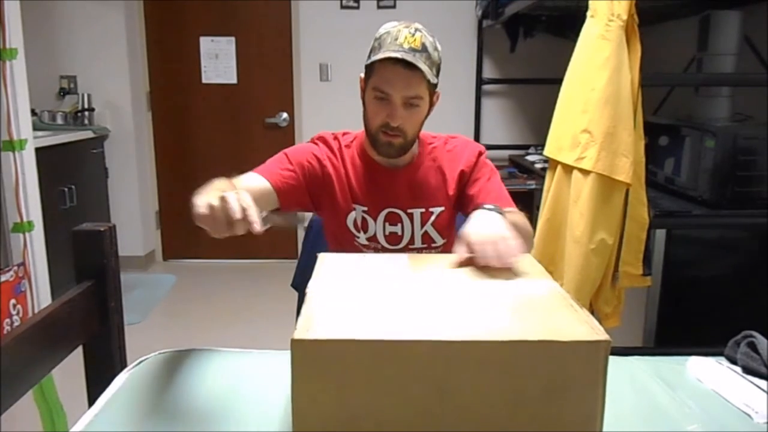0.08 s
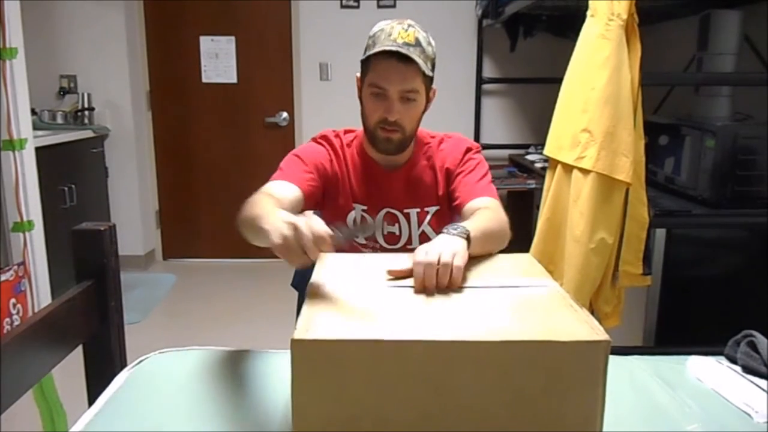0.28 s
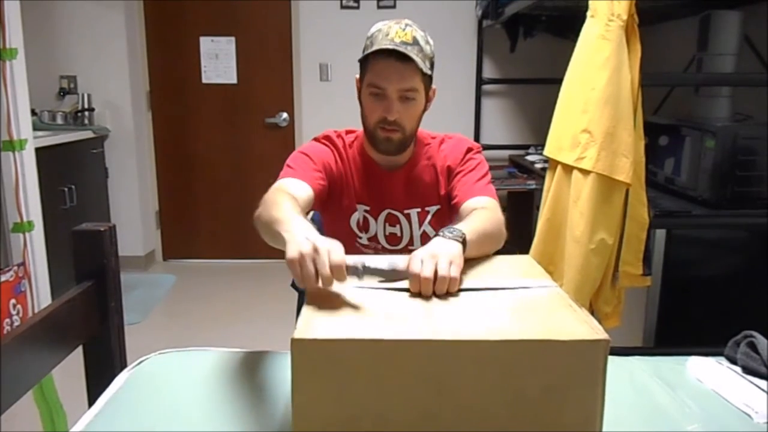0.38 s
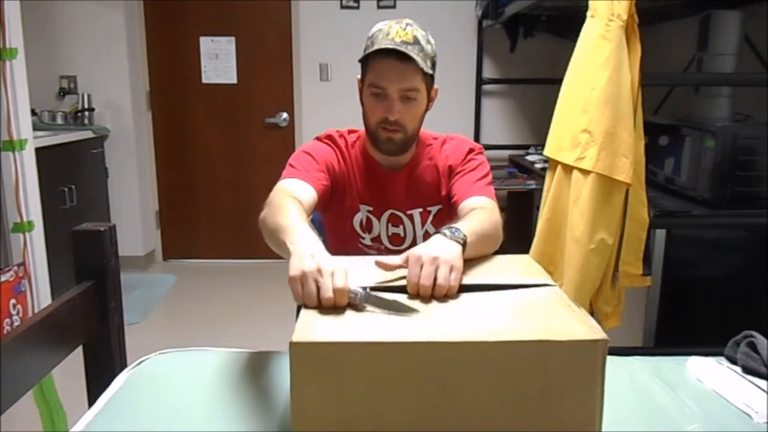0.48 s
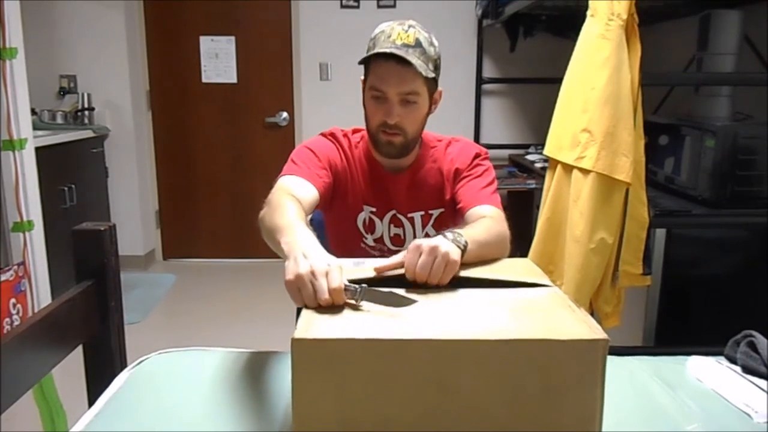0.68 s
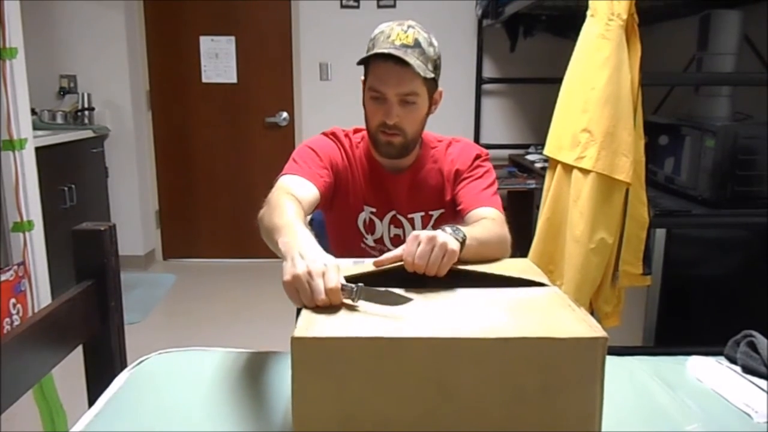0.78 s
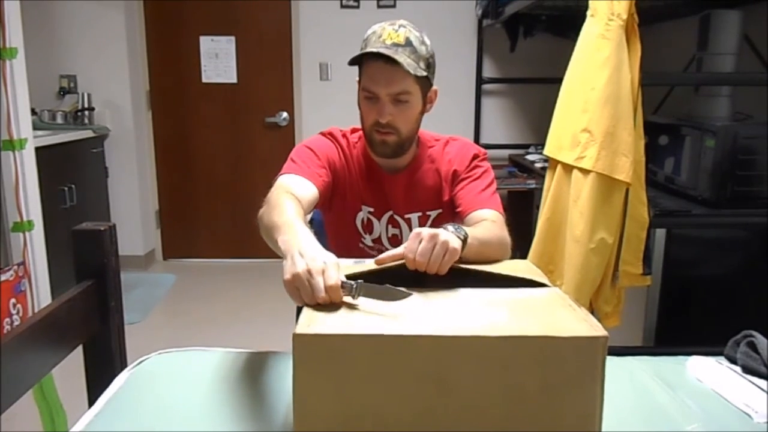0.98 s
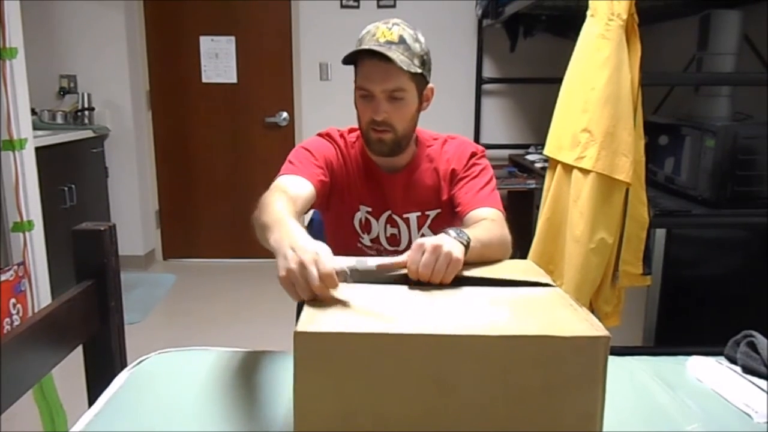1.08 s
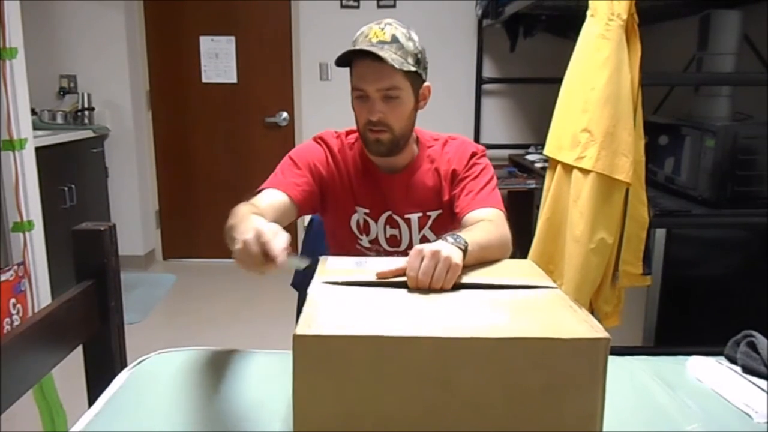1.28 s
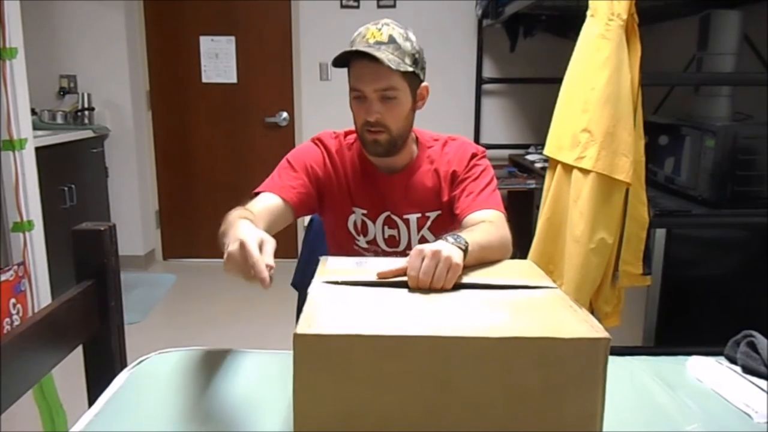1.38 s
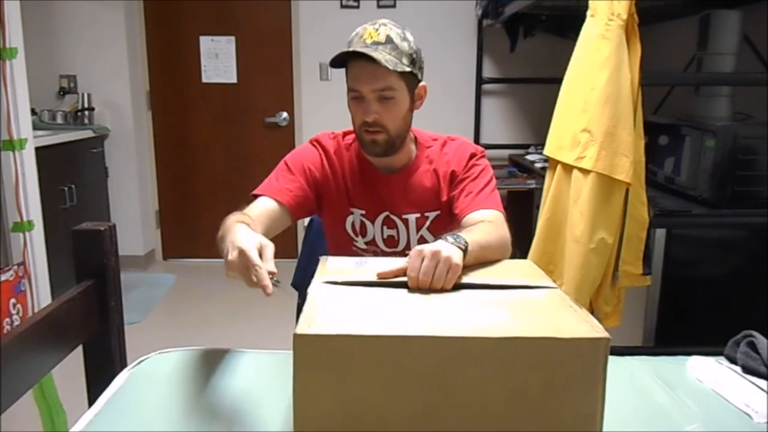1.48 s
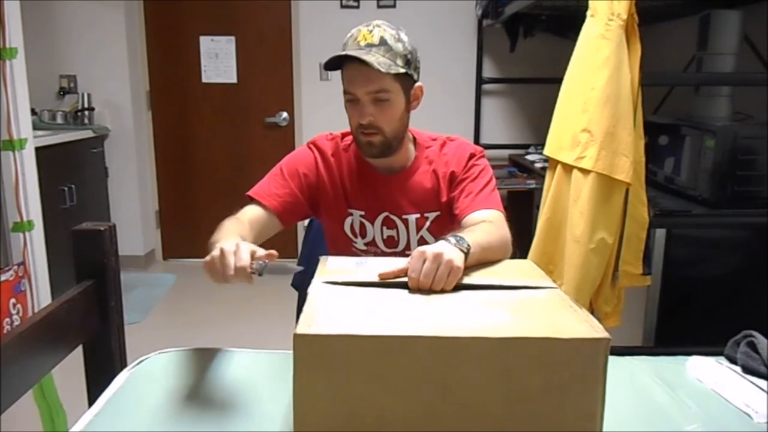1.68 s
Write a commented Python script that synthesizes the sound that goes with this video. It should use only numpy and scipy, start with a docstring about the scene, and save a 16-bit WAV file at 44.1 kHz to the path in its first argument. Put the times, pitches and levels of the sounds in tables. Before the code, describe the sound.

Gritty knife strokes start softly, then surge with crackling tape and hollow cardboard knocks, strongest near 0.7 seconds, before a lull and three final taps. Short room reflections over low steady air noise, single microphone nearby.

```python
"""A knife works through the packing tape of a cardboard box on a table in a small, hard-walled room. Over low,
steady ventilation noise a hand slides along the flap from the start and then the blade scrapes, in stick-slip
grains coloured as rasp and hiss, while the taut tape snaps in bright bursts of filtered noise. From about 0.24
s flaps knock on the box: noise crumples ring its panels, and brief low groans waver between them. Three late
knocks come after 1.1 s as the scrape fades. Blade and box excite decaying room reflections; the ventilation
stays dry."""
import sys
import numpy as np
from scipy import signal
from scipy.fft import rfft, irfft
from scipy.io import wavfile
from scipy.ndimage import uniform_filter1d

SR = 44100
rng = np.random.default_rng(int(sys.argv[2]) if len(sys.argv) > 2 else 0)


def dump_mix(stems):
    """Bounce the given channels to the path in sys.argv[1] as a 16-bit WAV at rate SR."""
    frames = np.atleast_2d(stems).T  # one column per channel
    limited = np.clip(frames, -1, 1)  # hard clip at full scale
    pcm = np.round(limited * 32767).astype(np.int16)
    wavfile.write(sys.argv[1], SR, pcm)


N = 74970  # length in samples, 1.7 s


def undb(db):
    """Decibels to gain."""
    return 10 ** (np.asarray(db) / 20)


def unit(x):
    """Scale to rms 1."""
    return x / np.sqrt(np.mean(x ** 2))


def blow(x):
    """Scale a transient to the energy of 10 ms at rms 1."""
    return x * np.sqrt(.01 * SR / np.sum(x ** 2))


def add(out, start_s, x):
    """Mix a sound in at its time."""
    i = max(int(start_s * SR), 0)
    out[i:i + len(x)] += x[:N - i]


def on_log_axis(hz, points):
    """Read a table of (Hz, value) points, interpolating along log frequency."""
    point_hz, value = np.array(points).T
    return np.interp(np.log(np.maximum(hz, 1)), np.log(point_hz), value)


def colour(x, points, size=4096):
    """Minimum-phase filter with the given spectrum, made by folding its cepstrum."""
    gain = undb(on_log_axis(np.fft.rfftfreq(size, 1 / SR), points))
    cepstrum = irfft(np.log(gain))
    # fold the negative times onto the positive ones, so the filter is causal
    cepstrum[1:size // 2] *= 2
    cepstrum[size // 2 + 1:] = 0
    response = irfft(np.exp(rfft(cepstrum)))
    return signal.fftconvolve(x, response)[:len(x)]


def band(x, hz, width_hz):
    """One resonance."""
    q = hz / min(width_hz, SR / 3)
    return signal.lfilter(*signal.iirpeak(hz, q, fs=SR), x)


def double_band(x, hz, width_hz):
    """One resonance with steeper skirts: the same peak filter twice."""
    return band(band(x, hz, width_hz), hz, width_hz)


def dull(x, hz, order=2):
    """Low-pass."""
    return signal.sosfilt(signal.butter(order, min(hz, SR / 3), fs=SR, output="sos"), x)


def thin(x, hz):
    """High-pass."""
    return signal.sosfilt(signal.butter(3, hz, "high", fs=SR, output="sos"), x)


def walk(rate_hz):
    """Smooth random wander of rms 1: held random steps under a moving average."""
    hold = int(SR / rate_hz)
    steps = np.repeat(rng.standard_normal(N // hold + 1), hold)
    return unit(uniform_filter1d(steps, hold)[:N])


def ring(x):
    """Drive the quickly dying modes of the box panels."""
    # ringing of the box panels: mode_hz, relative level_db
    box_modes = [(480, 1.5), (572, 3.5), (1133, 10), (1215, 5), (1301, 8.5), (1440, 5), (1770, 7),
                 (1903, 7.5), (2080, 13.5), (2398, 0), (2860, -13), (4440, 15.5), (6200, 14)]
    t60_s = .06
    t = np.arange(len(x)) / SR
    modes = sum(undb(level_db) * np.cos(2 * np.pi * mode_hz * t) for mode_hz, level_db in box_modes)
    response = modes * np.exp(-np.log(1000) * t / t60_s)
    return signal.fftconvolve(x, response)[:len(x)]


def ventilation(waver_db=1.9):
    """Gently wavering air noise with one duct resonance."""
    # spectrum of the moving air: frequency_hz, relative level_db (per Hz)
    air_colour = [(25, -15), (55, -27.5), (120, -12.5), (230, -12.5), (400, 0.5), (540, -5), (800, -7),
                  (1350, -8), (1800, -17), (2900, -17.5), (5000, -24.5), (10500, -43)]
    air_db, duct_db = -51, -58
    duct_hz, duct_width_hz = 422, 40
    air = unit(colour(rng.standard_normal(N), air_colour))
    air *= undb(air_db + waver_db * walk(13.1))
    duct = double_band(rng.standard_normal(N), duct_hz, duct_width_hz)
    return air + undb(duct_db) * unit(duct)


def grains():
    """Dense stick-slip clicks of uneven size and random sign."""
    grains_per_s, range_db = 3100, 14
    clicks = rng.random(N) < grains_per_s / SR
    return clicks * rng.choice([-1, 1], N) * undb(-range_db * rng.random(N))


def catches():
    """Gain of the friction: fibres catch and tear at random, each a brief surge."""
    catches_per_s, decay_s, surge_db = 90, .002, 8
    tears = (rng.random(N) < catches_per_s / SR) * rng.uniform(0.55, 1, N)
    surge = signal.lfilter([1], [1, -np.exp(-1 / (decay_s * SR))], tears)
    return unit(undb(surge_db * np.minimum(surge, 1)))


def blade_scrape(ring_db=-9):
    """Friction grains rasp through the cardboard and hiss on the tape; both crackle as fibres tear."""
    # blade and hand along the seam: time_s, relative rasp_db (cardboard), relative hiss_db (tape)
    scrape_moves = [(0, -35.5, -51), (0.032, -45.5, -41.5), (0.056, -37.5, -45), (.10, -46.5, -38.5),
                    (.125, -48, -75), (.222, -61, -67), (0.237, -37, -40.5), (.30, -33, -47),
                    (.335, -27, -33.5), (0.40, -37, -53.5), (.42, -35, -44), (.48, -32.5, -43.5),
                    (.55, -39, -45), (.58, -33, -52), (.61, -40, -64), (.635, -39.5, -41),
                    (0.699, -33, -36.5), (.785, -32, -67), (.82, -38, -55), (.91, -44.5, -45),
                    (1.0, -53.5, -59), (1.05, -45.5, -56), (1.11, -39, -45), (1.19, -36.5, -68.5),
                    (1.25, -44.5, -58), (1.34, -64.5, -82)]
    # spectra of cardboard rasp and tape hiss: frequency_hz, relative level_db (per Hz)
    rasp_colour = [(40, -15), (150, -24), (300, -0.5), (800, 7.5), (1300, 7), (2700, 10), (4500, 3.5),
                   (7000, -2), (10500, -43)]
    hiss_colour = [(500, -30), (2300, -3), (4600, 2), (5600, -6), (8300, -6), (10500, -12)]
    t = np.arange(N) / SR
    time_s, rasp_db, hiss_db = np.array(scrape_moves).T
    slips = grains()
    rasp = unit(colour(slips, rasp_colour)) + undb(ring_db) * unit(ring(slips))
    hiss = unit(colour(grains(), hiss_colour))
    rasp *= undb(np.interp(t, time_s, rasp_db))
    hiss *= undb(np.interp(t, time_s, hiss_db))
    return (rasp + hiss) * catches()


def tape_snaps(dull_hz=8500):
    """The taut film gives way in bright cracks about a millisecond long."""
    # cracks of the tape: start_s, relative level_db, centre_hz, width_hz
    snap_events = [(.005, -28, 2700, 1500), (0.3016, -28, 6500, 3100), (0.3136, -26, 6650, 2500),
                   (0.316, -14.5, 6540, 1780), (0.319, -19.5, 5000, 4500), (0.3292, -24, 6800, 8000),
                   (0.4496, -19, 5840, 8000), (0.4615, -25, 3570, 2500), (0.523, -30.5, 7500, 5000),
                   (0.6191, -23.5, 8800, 3460), (0.6208, -22.5, 4200, 6000), (.7062, -19, 4130, 2500),
                   (0.718, -25, 4400, 3000)]
    decay_s = .0009
    out = np.zeros(N)
    t = np.arange(N // 100) / SR
    for start_s, level_db, centre_hz, width_hz in snap_events:
        burst = rng.standard_normal(len(t)) * np.exp(-t / decay_s)
        crack = dull(band(burst, centre_hz, width_hz), dull_hz, order=4)
        add(out, start_s, undb(level_db) * blow(crack))
    return out


def cardboard_knocks():
    """Each contact is a short crumple that rings the struck spot and the panels, and thumps the hollow box."""
    # contacts: start_s, relative level_db, thin_hz (high-pass), dull_hz (low-pass), crumple_s (decay),
    # relative thump_db, spot_hz (resonance of the struck spot)
    knock_events = [(0.2369, -21.5, 170, 5600, 0.0063, 8.5, 1026), (.3190, -18, 295, 5800, 0.014, -19, 730),
                    (.3580, -15, 446, 4180, 0.036, 0.5, 1474), (0.3705, -16, 630, 2740, 0.0026, 3, 1880),
                    (0.4506, -22.5, 200, 5440, 0.0051, 2, 1260),
                    (0.6204, -24, 230, 4600, 0.013, -3.5, 1290), (0.7056, -12, 327, 6500, 0.0022, 0, 1280),
                    (0.7116, -11, 300, 2580, 0.0074, 0.5, 1235), (0.7253, -16, 427, 6960, 0.0081, -1, 2730),
                    (0.756, -16, 398, 3540, 0.0035, -23, 2850), (.768, -18, 350, 3600, 0.012, -19, 523),
                    (1.1231, -16.5, 480, 2500, 0.0087, -12, 1150),
                    (1.1485, -15.5, 600, 3520, 0.011, -28, 742),
                    (1.1620, -16.5, 800, 2490, 0.024, -42, 2430)]
    # spectrum of struck cardboard: frequency_hz, relative level_db (per Hz)
    card_colour = [(40, -54), (120, -31.5), (330, -20.5), (540, 4), (830, -19.5), (1200, 3.5), (2200, 1),
                   (4000, 0), (6500, -5), (10500, -16)]
    attack_s = 0.00044
    ring_db, spot_db, base_thump_db = -6, -5, -23
    spot_q = 3.5
    thump_centre_hz, thump_width_hz = 200, 115
    out = np.zeros(N)
    t = np.arange(N // 5) / SR
    for start_s, level_db, thin_hz, dull_hz, crumple_s, thump_db, spot_hz in knock_events:
        envelope = np.exp(-t / crumple_s) * (1 - np.exp(-t / attack_s))
        push = dull(rng.standard_normal(len(t)) * envelope, dull_hz)
        spot = blow(double_band(push, spot_hz, spot_hz / spot_q))
        panels = blow(colour(push, card_colour)) + undb(ring_db) * blow(ring(push))
        body = thin(blow(panels + undb(spot_db) * spot), thin_hz)
        thump = blow(double_band(push, thump_centre_hz, thump_width_hz))
        knock = body + undb(base_thump_db + thump_db) * thump
        add(out, start_s, undb(level_db) * knock)
    return out


def flap_groans(waver=0.092):
    """The flaps flex under the blade with brief low notes of unsteady pitch."""
    # groans: centre_s, length_s (spread of the bell-shaped swell), pitch_hz, level_db
    groan_events = [(.243, .008, 370, -46), (.262, .018, 200, -53), (.402, .012, 250, -50),
                    (.497, .017, 270, -49), (.572, .014, 320, -55)]
    out = np.zeros(N)
    t = np.arange(N) / SR
    for centre_s, length_s, pitch_hz, level_db in groan_events:
        swell = np.exp(-.5 * ((t - centre_s) / length_s) ** 2)
        unsteady_hz = pitch_hz * (1 + waver * walk(100.4))
        note = unit(np.sin(2 * np.pi * np.cumsum(unsteady_hz) / SR))
        out += undb(level_db) * swell * note
    return out


def room_response():
    """Dense reflections that build up quickly and die soonest in the top treble."""
    # room decay: frequency_hz, t60_s
    room_t60 = [(150, 0.45), (500, 0.48), (1400, 0.46), (3600, 0.55), (6500, 0.36), (10000, 0.19)]
    build_s, gap_s = 0.0016, 0.00037
    t = np.arange(N // 2) / SR
    spectrum = rfft(rng.standard_normal(len(t)))
    hz = np.fft.rfftfreq(len(t), 1 / SR)
    edges_hz = np.append(0, np.geomspace(150, SR / 2, 48))
    tail = np.zeros(len(t))
    # each narrow band of noise decays at its own rate
    for low_hz, high_hz in zip(edges_hz, edges_hz[1:]):
        t60_s = on_log_axis((low_hz + high_hz) / 2, room_t60)
        band_noise = irfft(spectrum * ((hz >= low_hz) & (hz < high_hz)), len(t))
        tail += band_noise * np.exp(-np.log(1000) * t / t60_s)
    tail *= 1 - np.exp(-np.maximum(t - gap_s, 0) / build_s)
    return tail / np.sqrt(np.sum(tail ** 2))


def scene(knock_db=-9.0, snap_db=-9, scrape_db=-3):
    """Box and blade heard directly and through the room, over the ventilation."""
    scrape_send_db, snap_send_db, room_db = 2, -4, -7
    scrape = undb(scrape_db) * blade_scrape()
    snaps = undb(snap_db) * tape_snaps()
    box = undb(knock_db) * cardboard_knocks() + flap_groans()
    room_feed = box + undb(scrape_send_db) * scrape + undb(snap_send_db) * snaps
    echo = signal.fftconvolve(room_feed, room_response())[:N]
    mix = box + scrape + snaps + undb(room_db) * echo + ventilation()
    return mix[None]  # one channel


def record(dry):
    """A steep elliptic low-pass removes the top treble."""
    top_hz = 10350
    return signal.sosfilt(signal.ellip(10, .2, 75, top_hz, fs=SR, output="sos"), dry)


dry = scene()
out = record(dry)
dump_mix(out)
```